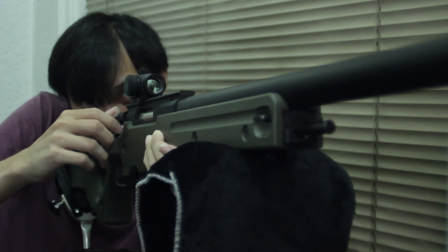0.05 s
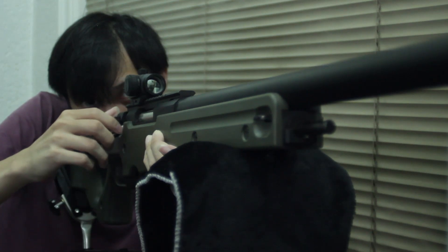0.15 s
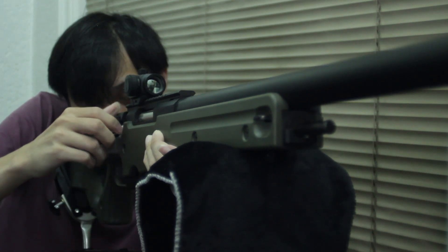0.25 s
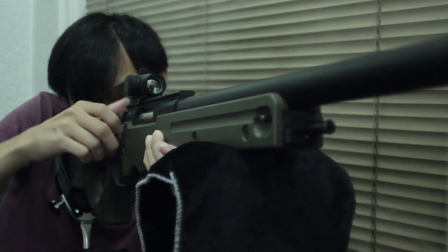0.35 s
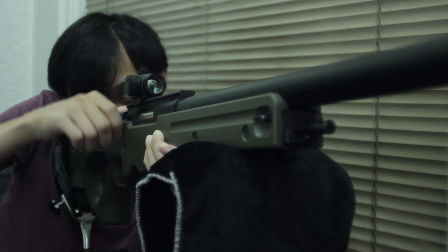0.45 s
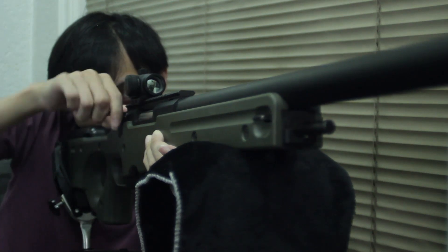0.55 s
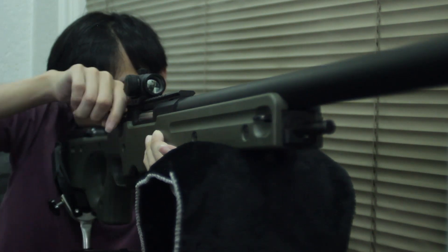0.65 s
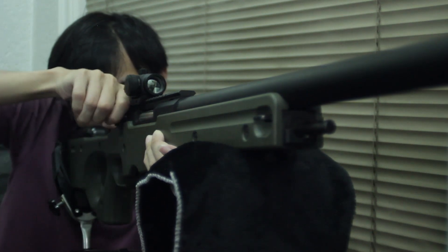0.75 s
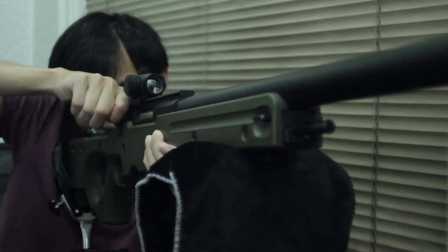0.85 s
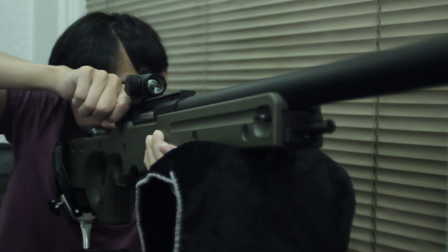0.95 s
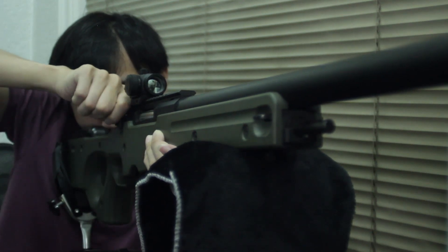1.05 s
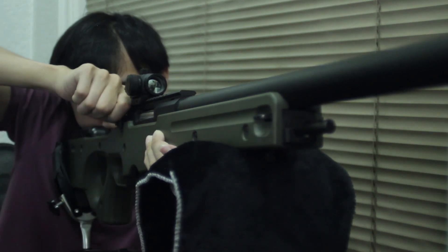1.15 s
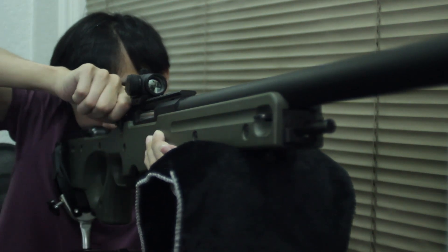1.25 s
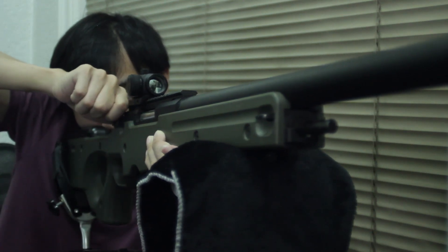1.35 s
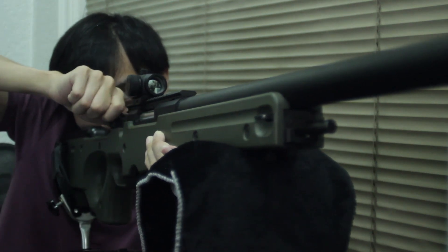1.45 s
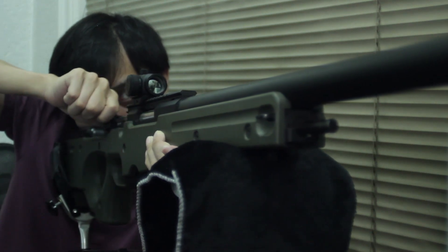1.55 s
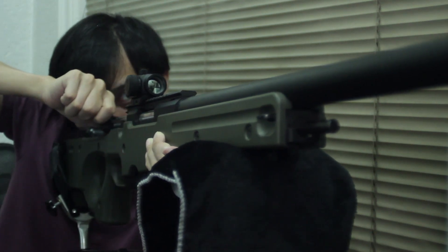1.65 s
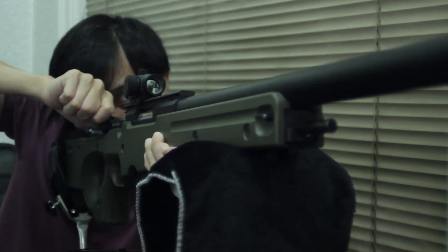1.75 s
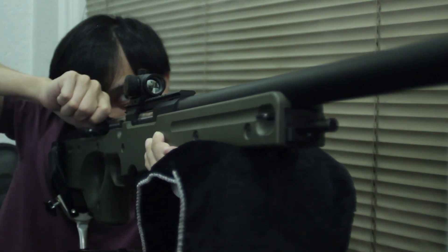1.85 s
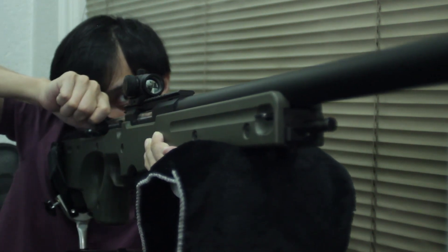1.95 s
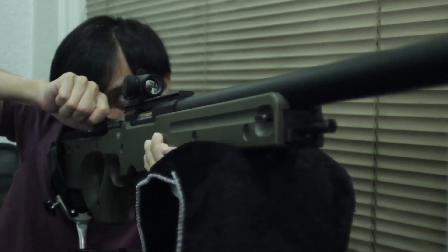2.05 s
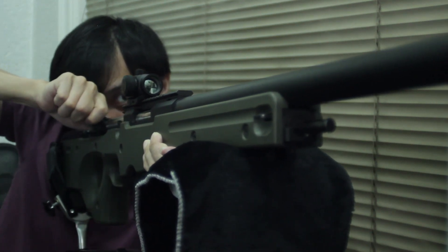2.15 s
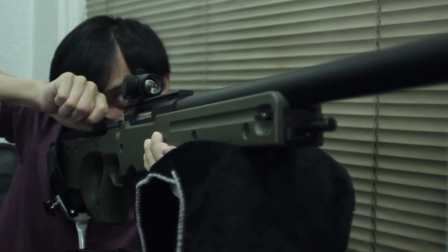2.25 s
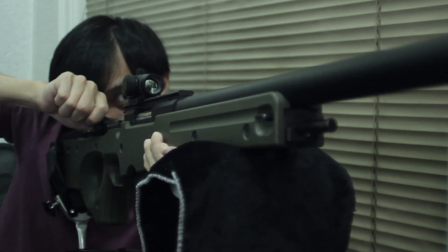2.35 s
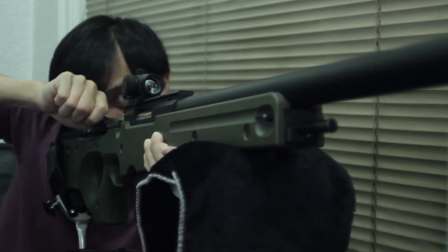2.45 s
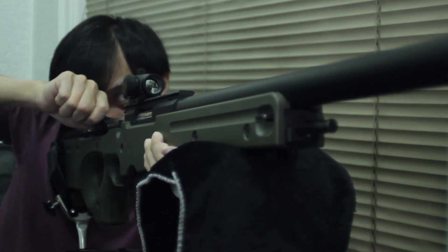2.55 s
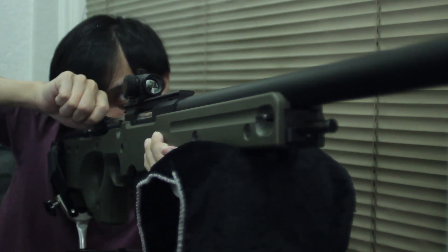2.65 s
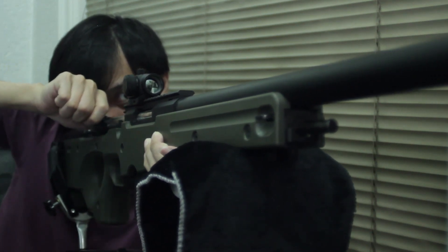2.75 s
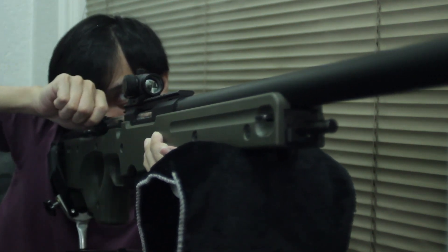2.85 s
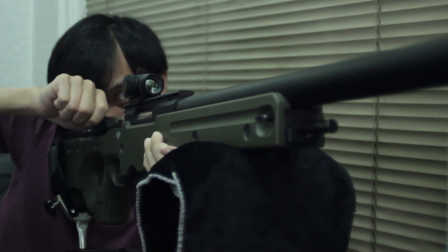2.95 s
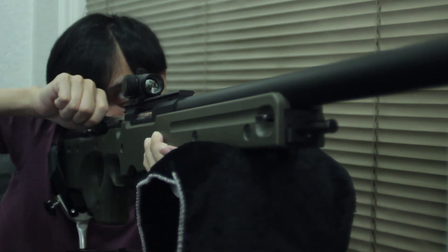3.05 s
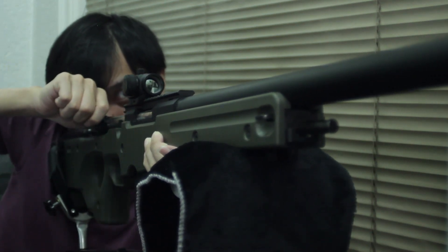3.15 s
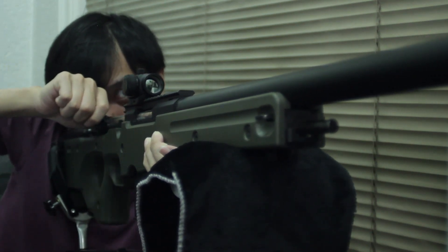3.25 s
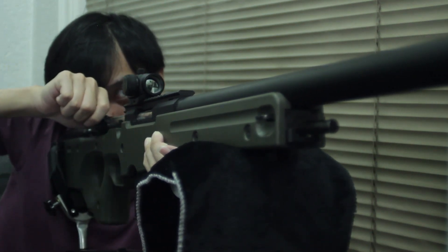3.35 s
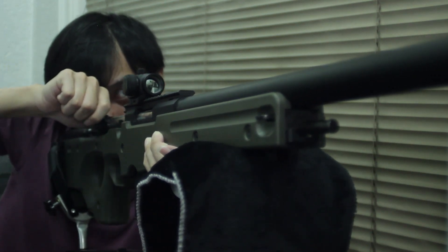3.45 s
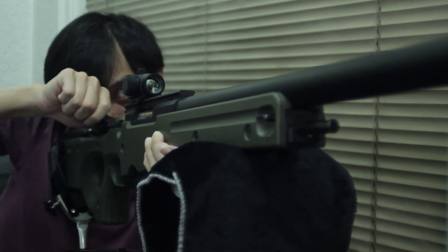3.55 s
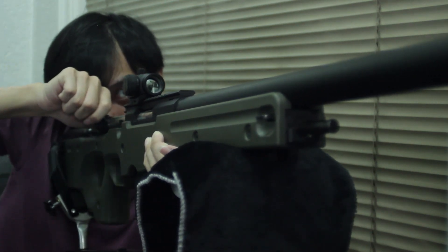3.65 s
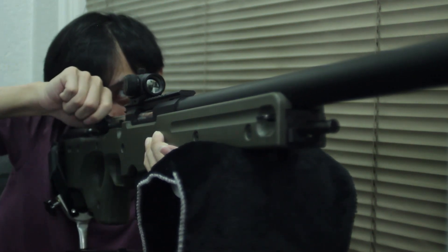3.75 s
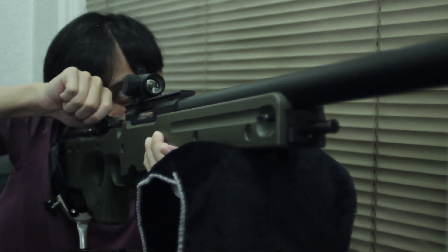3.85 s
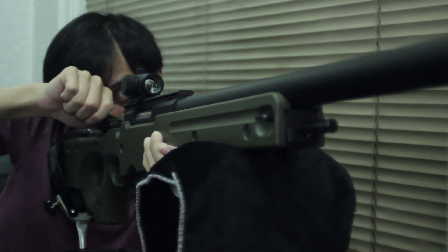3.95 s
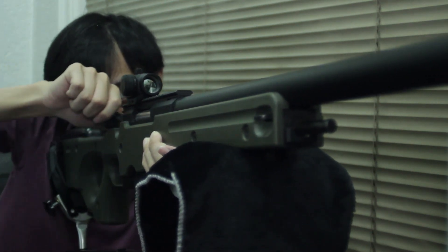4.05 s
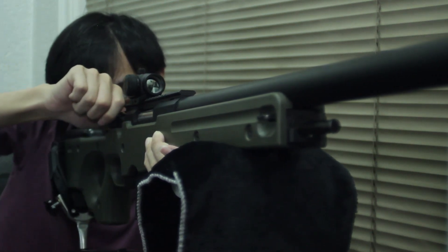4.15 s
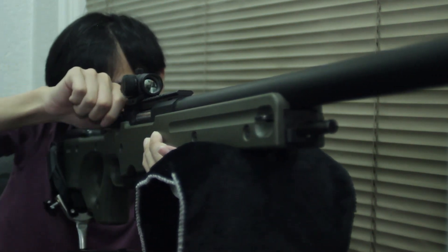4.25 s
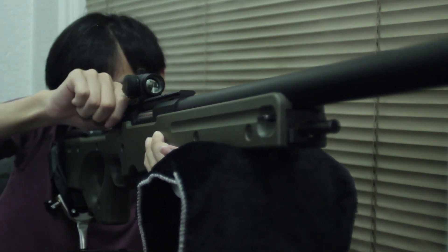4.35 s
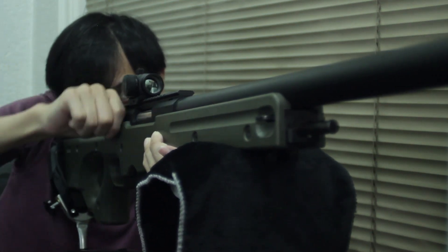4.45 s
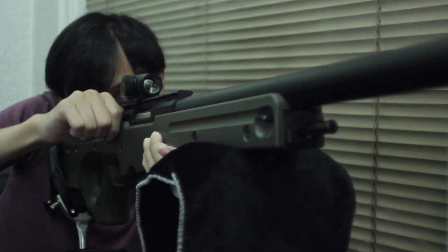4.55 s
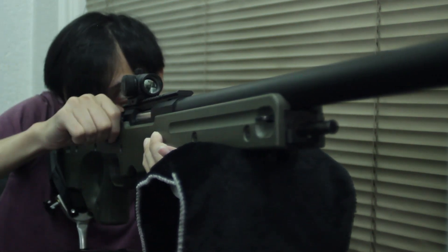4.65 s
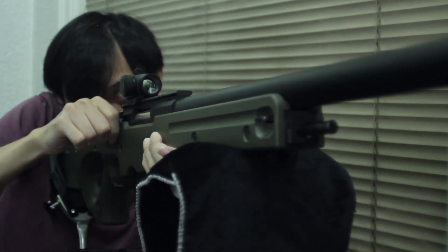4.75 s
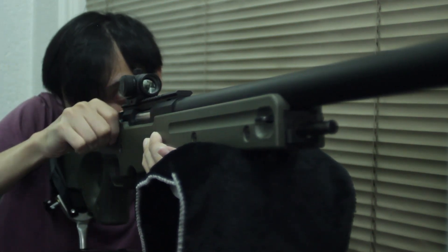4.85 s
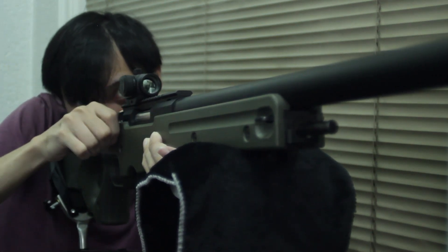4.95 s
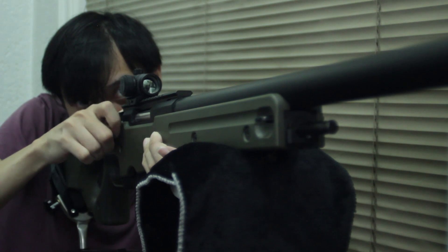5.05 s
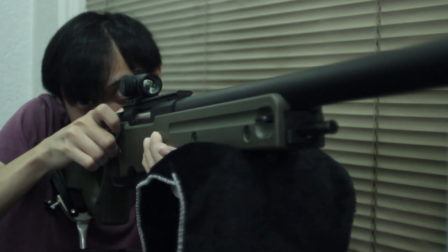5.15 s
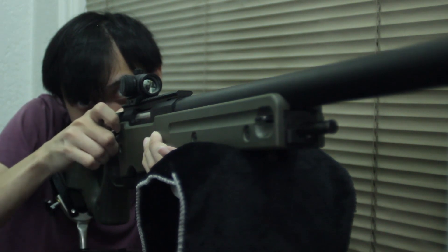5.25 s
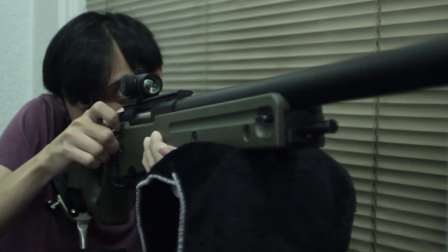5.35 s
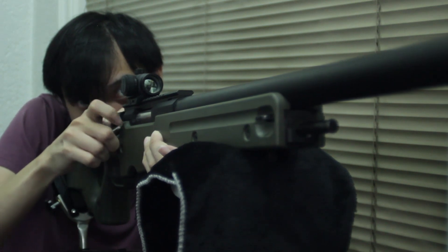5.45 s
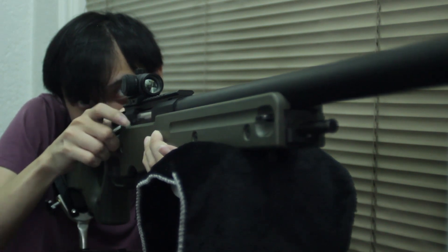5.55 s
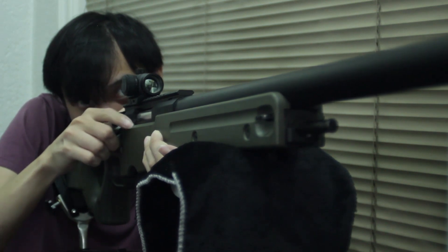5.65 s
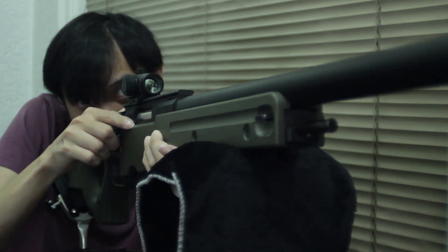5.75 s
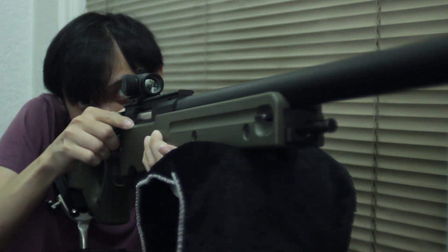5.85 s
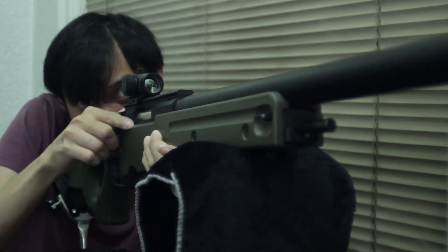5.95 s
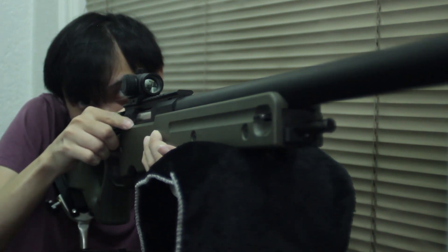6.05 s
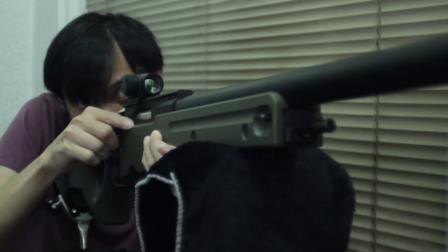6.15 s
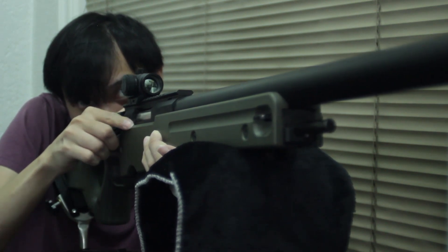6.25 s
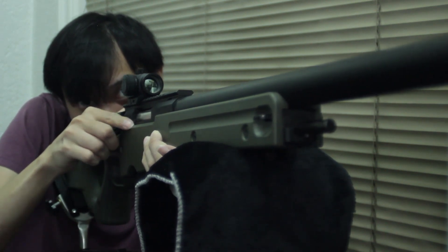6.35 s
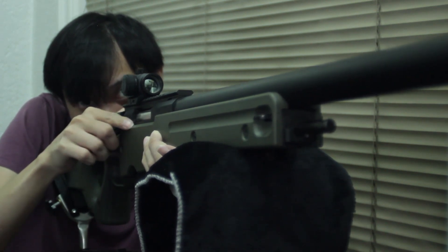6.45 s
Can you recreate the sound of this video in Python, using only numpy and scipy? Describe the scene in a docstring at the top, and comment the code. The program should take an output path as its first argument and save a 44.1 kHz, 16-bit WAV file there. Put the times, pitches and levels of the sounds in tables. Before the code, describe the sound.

A spring airsoft rifle's bolt is worked by hand: dull knock, scraping pull, catching clicks, then a sharp bright metallic snap home, over faint fan hum.

```python
"""In a small room with a running fan, the bolt of a spring airsoft rifle is worked by hand: the handle lifts,
the bolt scrapes back against the spring until the sear catches, is driven home, and the handle turns down.
Clacks, catches and snaps are chatters of tiny impacts that ring the modes of each part; scrapes are
stick-slip pulses through a sleeve resonance. Both get a short room tail. The fan is sine lines over shaped noise."""
import sys
import numpy as np
from scipy import signal
from scipy.fft import rfft, irfft, next_fast_len
from scipy.io import wavfile
from scipy.ndimage import map_coordinates

SR = 44100
rng = np.random.default_rng(int(sys.argv[2]) if len(sys.argv) > 2 else 0)


def digitize_waveform(pressure):
    """Quantize a signal to 16-bit integers and store it at the path in sys.argv[1].

    Rows of a 2-D input are taken as channels; values are limited to [-1, 1].
    """
    field = np.atleast_2d(pressure).T
    bounded = np.clip(field, -1, 1)
    quanta = np.round(bounded * 32767).astype(np.int16)
    wavfile.write(sys.argv[1], SR, quanta)


N = 287266

# Knock, clack and treble bands. Each row: lower edge in Hz, upper edge in Hz.
BANDS = [(150, 2000), (2000, 6000), (6000, 16000)]


def bolt_snaps():
    """Steel strikes steel as the bolt runs forward; its modes ring up into the treble."""
    # Each row: start in s, relative knock, clack and treble levels in dB, contact time in s, pitch in Hz.
    snap_rows = [(3.979, -48, -43, -39.5, 0.0013, 8000), (3.99, -29, -21.5, -23, 0.00088, 3800),
                 (3.992, -22, -25, -14.5, 0.0012, 8400), (4.1005, -53, -34, -37.5, 0.0013, 4460),
                 (4.2128, -55, -44, -42, 0.00086, 10000)]
    # Colour of the bolt contact. Each row: frequency in Hz, relative density in dB per Hz.
    bolt_colour = [(200, -31), (450, -26.5), (700, -14), (1140, -12), (1340, -15), (1550, -12), (1900, 3),
                   (2300, -10.5), (3600, 4.5), (6000, -3.5), (7000, -12), (7950, -2.5), (10300, -7.5),
                   (15500, -13)]
    # Ringing of the bolt. Each row: frequency in Hz, mean relative level in dB, t60 in s.
    bolt_modes = [(1375, -2, 0.17), (1695, -4, 0.096), (1890, -1, .16), (1870, -12, 0.17), (3780, 2, 0.11),
                  (4780, 3, 0.13), (5712, -10.5, .12), (8000, 6, 0.11), (7700, -10, .13), (7930, -23, 0.13),
                  (8200, -3, .14), (8573, -6, .11), (8540, -6, .11)]
    return blows(snap_rows, bolt_colour, bolt_modes,
                 level_db=24, ring_db=-12.5, wet_db=2.5, rough=0.63, spot_db=2.5)


def stock_clacks():
    """Bolt and handle knock dully on the stock and ring its modes."""
    # Each row: start in s, relative knock, clack and treble levels in dB, contact time in s, pitch in Hz.
    clack_rows = [(.5812, -41, -44, -54, 0.00089, 1900), (.5838, -24.5, -32, -34, .0011, 984),
                  (1.577, -50, -43, -63, .0012, 1290), (1.584, -31.5, -38.5, -61, 0.00096, 714),
                  (1.671, -42, -51, -61, 0.00097, 1400), (1.809, -35, -36, -40, 0.00076, 1020),
                  (1.972, -33, -38.5, -45, 0.0012, 1110), (2.102, -40, -37, -46, 0.0024, 1590),
                  (2.391, -33.5, -34.5, -50, 0.0015, 1730), (4.0735, -31.5, -47, -51, 0.00078, 1310),
                  (4.139, -32.5, -46, -55, 0.0011, 1420), (4.338, -32, -47, -48, 0.00072, 1500),
                  (4.351, -28.5, -26.5, -42.5, 0.001, 3170), (4.5035, -35, -51.5, -66, 0.0014, 970),
                  (5.1515, -35, -39, -47, 0.0014, 1860), (5.1705, -37, -36.5, -43, 0.0018, 6860),
                  (5.639, -52.5, -49.5, -51.5, 0.0016, 4420), (5.683, -56, -60, -62, 0.0013, 1300),
                  (6.303, -47.5, -55.5, -72, 0.0012, 700)]
    # Colour of the stock contact. Each row: frequency in Hz, relative density in dB per Hz.
    stock_colour = [(150, -19), (300, -7), (420, -13.5), (680, -10.5), (830, -3), (980, 2.5), (1150, 1),
                    (1370, -1.5), (1580, -4.5), (1850, -3.5), (2500, -5.5), (3900, -4.5), (6000, -15.5),
                    (10000, -23), (16000, -37)]
    # Ringing of the stock. Each row: frequency in Hz, mean relative level in dB, t60 in s.
    stock_modes = [(844, -8.5, 0.083), (944, 4, 0.19), (1015, 3, 0.11), (1082, -10, 0.11), (1372, 0, 0.11),
                   (1493, 1, 0.095), (1813, 2, 0.14), (2190, -11, 0.18), (2554, -7.5, 0.3),
                   (3270, -22, 0.1), (4090, -6, 0.093), (5370, -22, 0.13)]
    return blows(clack_rows, stock_colour, stock_modes,
                 level_db=28, ring_db=-6.5, wet_db=4.5, rough=0.52, spot_db=2.5)


def sear_catches():
    """The sear and other small steel parts catch and ring their modes."""
    # Each row: start in s, relative knock, clack and treble levels in dB, contact time in s, pitch in Hz.
    catch_rows = [(.983, -43, -47, -47.5, 0.001, 5350), (1.367, -52, -43.5, -41.5, 0.0011, 5500),
                  (1.402, -44, -53, -45, 0.0017, 5400), (1.859, -41, -38.5, -40.5, .001, 3400),
                  (1.889, -39, -39.5, -38, 0.0028, 3400), (2.1305, -29.5, -32, -32, 0.0013, 4650),
                  (2.1335, -31.5, -28, -23, 0.0014, 1910), (4.261, -51, -34.5, -42, 0.00064, 4100),
                  (4.2765, -35.5, -29, -30.5, 0.0017, 1000), (4.281, -35, -27.5, -32.5, .001, 4100),
                  (4.598, -70, -45.5, -67, 0.00069, 3930)]
    # Colour of the sear contact. Each row: frequency in Hz, relative density in dB per Hz.
    sear_colour = [(120, -29), (200, -13), (231, -28), (283, -19), (497, -17.5), (575, -16), (1350, -3.5),
                   (1590, -5), (1950, -5), (3070, 1), (4100, 3), (6020, -8.5), (15500, -11)]
    # Ringing of the sear. Each row: frequency in Hz, mean relative level in dB, t60 in s.
    sear_modes = [(1328, 14, 0.087), (1870, -4, .18), (2030, -10, .18), (2960, -14, 0.26), (4100, -5, 0.12),
                  (4160, 2, 0.15), (4160, -7, .16), (4700, -12, .15), (4900, 5, 0.093), (5260, -17, .14),
                  (8280, 9, .14)]
    return blows(catch_rows, sear_colour, sear_modes,
                 level_db=26.0, ring_db=-16.5, wet_db=6.0, rough=0.26, spot_db=1)


def blows(rows, spectrum, modes, level_db, ring_db, wet_db, rough, spot_db):
    """Each contact is a short chatter of tiny impacts that rings the part's modes and the room."""
    track = np.zeros(N)
    t = np.arange(SR // 2) / SR
    mode_hz, mode_db, t60_s = np.transpose(modes)[:, :, None]
    for start_s, *levels_db, contact_s, pitch_hz in rows:
        u = t / max(contact_s, 1e-4)
        grains = rng.standard_normal(len(t)) * np.exp(rough * rng.standard_normal(len(t)))
        chatter = grains * u * np.exp(-u)
        knock = resonant(coloured(chatter, spectrum), pitch_hz, spot_db, q=6.1)
        knock = norm(in_room(knock, wet_db))

        scatter_db = 2 * rng.standard_normal(t60_s.shape)
        strength = amp(mode_db + scatter_db - 60 * t / t60_s)
        phase = 2 * np.pi * (mode_hz * t + rng.random(t60_s.shape))
        ring = np.sum(strength * np.sin(phase), axis=0) * (1 - np.exp(-u))
        blow = knock + amp(ring_db) * norm(ring)
        # where and how hard the part is struck sets the balance of the bands
        for db, edges_hz in zip(levels_db, BANDS):
            add(track, start_s, amp(db + level_db) * norm(band(blow, edges_hz, order=4)))
    return track


def sliding(slips_per_s=450, spread_db=5, hiss_db=-12, wet_db=2, sleeve_db=-1,
            clack_db=-4, clack_share=0.69, usual_db=-12):
    """The bolt sticks and slips in its sleeve; dry steel edges add a sharp rasp."""
    # Pushes of the hand. Each row: start in s, length in s, relative level in dB, swell over the push in dB,
    # sharpness in dB, sleeve pitch in Hz.
    strokes = [(.405, 0.013, -57, -4, 0, 3120), (.98, 0.022, -47, 2, -11, 700),
               (1.349, .06, -42.5, -3.5, -3.5, 5400), (1.432, 0.043, -44.5, 5, -13, 2500),
               (1.497, 0.096, -35, 1, -12.5, 960), (1.673, 0.046, -37, -1.5, -11, 1100),
               (1.844, 0.05, -39, 1, -5.5, 1600), (2.106, 0.022, -39, 11.5, -7, 1810),
               (2.39, 0.013, -39, -7, -9, 1370), (4.04, 0.11, -44.5, 1, 4.5, 4220),
               (4.23, .02, -40, -4, -12, 4220), (4.279, 0.04, -35, -10, -4, 1590),
               (4.349, 0.024, -31.5, -7, -11.5, 1600), (4.519, 0.023, -41, -1, -22, 930),
               (4.576, 0.019, -51, -3, 1, 4000), (5.157, 0.029, -33.5, -8.5, -24, 1110),
               (5.646, .012, -49, -5, -10, 1320)]
    # Colour of the rubbing. Each row: frequency in Hz, relative density in dB per Hz.
    rub_colour = [(150, -22), (300, -17), (450, -9.5), (680, -8), (950, -5), (1800, -7), (2300, -4),
                  (3300, 0.5), (4400, -7.5), (6500, -17.5), (9500, -23.5), (12000, -28.5), (15500, -30)]
    track = np.zeros(N)
    t = np.arange(-SR // 10, SR // 2) / SR
    for start_s, length_s, db, swell_db, sharp_db, pitch_hz in strokes:
        sizes_db = spread_db * rng.standard_normal(len(t)).clip(-2, 1)
        sizes = rng.choice([-1, 1], len(t)) * amp(sizes_db)
        slips = sizes * (rng.random(len(t)) < slips_per_s / SR)
        hiss = amp(hiss_db) * rng.standard_normal(len(t))
        rub = coloured(unit(slips) + hiss, rub_colour)
        rub = resonant(rub, pitch_hz, sleeve_db, q=2.9)
        knock, clack, rasp = (unit(band(rub, edges_hz)) for edges_hz in BANDS)
        force = amp(db + push_db(t, length_s, swell_db))
        # a sharper edge lifts the treble fully and the middle in part
        clack_gain = amp(clack_db + clack_share * (sharp_db - usual_db))
        scrape = force * (knock + clack_gain * clack + amp(sharp_db) * rasp)
        add(track, start_s + t[0], in_room(scrape, wet_db) / np.hypot(1, amp(wet_db)))
    return track


def push_db(t, length_s, swell_db):
    """The hand takes up the load, presses harder or eases off along the way, then lets go."""
    fade_db, grip_s, release_s = 20, 0.018, 0.042  # rise and decay times per fade_db
    press_db = swell_db * (np.clip(t / length_s, 0, 1) - .5)
    before = np.maximum(-t, 0) / grip_s
    after = np.maximum(t - length_s, 0) / release_s
    return press_db - fade_db * (before + after)


def in_room(x, wet_db, gap_s=0.0011, treble_db=-3.0, size=256):
    """Adds the answer of the near walls; each frequency dies at its own speed, and blinds soak up treble."""
    # Decay of the room. Each row: frequency in Hz, t60 in s.
    room_t60 = [(300, 0.24), (800, 0.15), (2000, 0.2), (5500, 0.2), (14600, 0.17)]
    hz, t, z = signal.stft(rng.standard_normal(SR // 2), SR, nperseg=size)
    decay = amp(-60 * t / along(room_t60, hz)[:, None])
    tail = signal.istft(z * decay, SR, nperseg=size)[1]
    build_up = 1 - np.exp(-np.arange(len(tail)) / SR / gap_s)
    tail = coloured(norm(tail * build_up), [(3000, 0), (9000, treble_db)])
    return x + amp(wet_db) * signal.fftconvolve(x, tail)[:len(x)]


def fan(air_db=-54.5, hum_db=0, waver_db=0.3, drift_rad=0.2):
    """Slightly unsteady motor lines over a soft rush of air."""
    # Fan and motor lines. Each row: frequency in Hz, mean rms level in dB.
    hum_lines = [(57.5, -58.5), (69.1, -62), (115.0, -60.5), (120.2, -65.5), (152.5, -67.5), (172.5, -60.5),
                 (177.6, -61.5), (287.5, -72.5), (297.7, -62.5), (343.1, -71.5), (360.4, -69.5),
                 (580.1, -77.5)]
    # Colour of the air. Each row: frequency in Hz, relative density in dB per Hz.
    air_colour = [(20, -23), (35, -17), (59, -10), (90, -9.5), (160, -5), (240, -9.5), (330, -9.5),
                  (410, -10.5), (650, -14.5), (1020, -17), (1800, -20.5), (2420, -23), (9810, -31.5),
                  (15500, -32)]
    t = np.arange(N) / SR
    hum = np.zeros(N)
    for hz, db in hum_lines:
        level = amp(db + waver_db * wobble(2.99))
        phase = 2 * np.pi * (hz * t + rng.random()) + drift_rad * wobble(2.0)
        hum += level * np.sin(phase)
    air = unit(coloured(rng.standard_normal(N), air_colour, size=8192))
    return amp(hum_db) * np.sqrt(2) * hum + amp(air_db) * air


def amp(db):
    """Decibels to gain."""
    return 10 ** (np.asarray(db) / 20)


def unit(x):
    """x at rms 1."""
    return x / np.sqrt(np.mean(x ** 2) + 1e-20)


def norm(x):
    """x at energy 1."""
    return x / np.sqrt(np.sum(x ** 2) + 1e-20)


def along(points, hz):
    """(Hz, value) points read on a log frequency axis."""
    point_hz, value = np.transpose(points)
    return np.interp(np.log(hz + 1), np.log(point_hz + 1), value)


def wobble(knots_per_s):
    """A smooth random curve through normal-distributed knots."""
    knots = rng.standard_normal(int(N * knots_per_s / SR) + 4)
    return map_coordinates(knots, [np.arange(N) * knots_per_s / SR])


def add(track, start_s, sound):
    """Mixes a sound into the track in place."""
    part = track[round(start_s * SR):][:len(sound)]
    part += sound[:len(part)]


def coloured(x, spectrum, size=2048):
    """x through a causal minimum-phase filter with this spectrum, by a folded cepstrum."""
    gain = amp(along(spectrum, np.fft.rfftfreq(size, 1 / SR)))
    cepstrum = irfft(np.log(gain + 1e-6))
    fold = np.r_[1, np.full(size // 2 - 1, 2), 1, np.zeros(size // 2 - 1)]
    impulse = irfft(np.exp(rfft(cepstrum * fold)))
    return signal.fftconvolve(x, impulse)[:len(x)]


def band(x, edges_hz, order=3):
    """The part of x between two frequencies."""
    return signal.sosfilt(signal.butter(order, edges_hz, "bandpass", fs=SR, output="sos"), x)


def resonant(x, hz, boost_db, q):
    """x with one broad resonance lifted: the spot where the parts meet."""
    return x + amp(boost_db) * signal.lfilter(*signal.iirpeak(hz, q, fs=SR), x)


def scene():
    """The rifle's snaps, knocks and scrapes in the humming room."""
    return (bolt_snaps() + stock_clacks() + sear_catches() + amp(-2) * sliding() + fan())[None]


def record(dry):
    """Removes everything from the band limit up."""
    top_hz = 15850
    size = next_fast_len(N + SR // 2)
    kept = np.fft.rfftfreq(size, 1 / SR) < top_hz
    return irfft(rfft(dry, size) * kept, size)[:, :N]


dry = scene()
out = record(dry)
digitize_waveform(out)
```